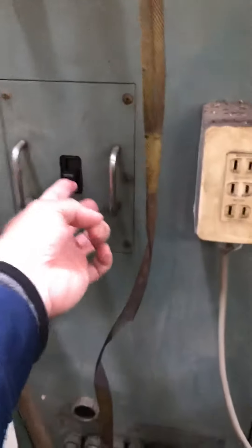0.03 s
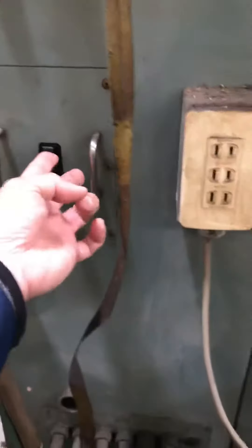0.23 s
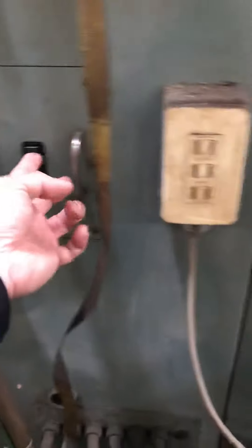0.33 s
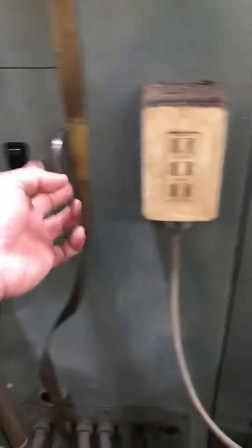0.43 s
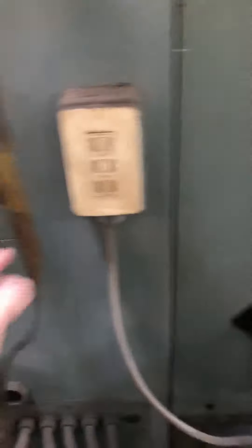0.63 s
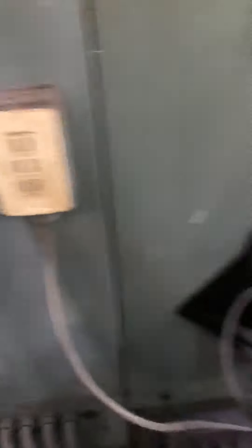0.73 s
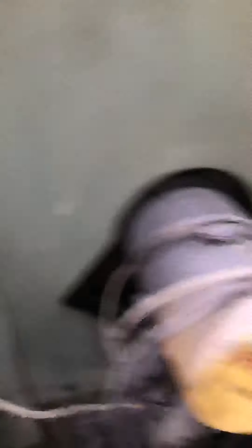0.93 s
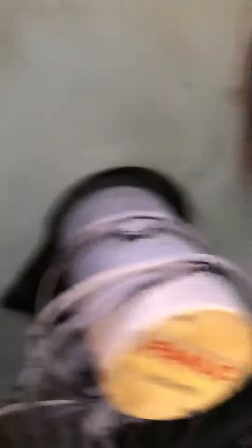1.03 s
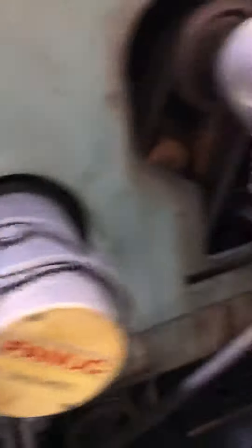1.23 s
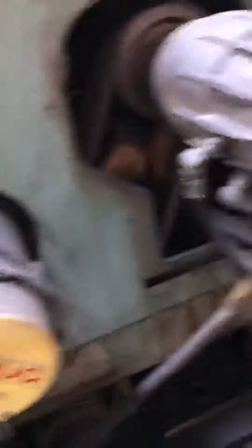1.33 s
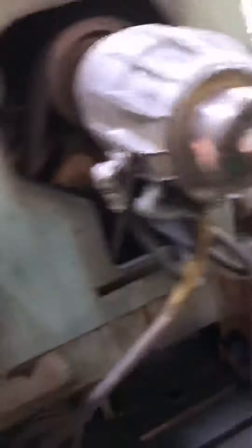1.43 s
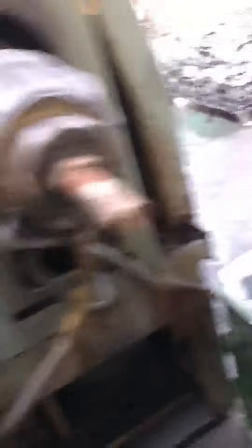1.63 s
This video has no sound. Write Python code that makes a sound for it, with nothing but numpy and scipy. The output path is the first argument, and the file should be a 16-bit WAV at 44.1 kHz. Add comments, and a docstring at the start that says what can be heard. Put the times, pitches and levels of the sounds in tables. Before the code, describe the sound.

A heavy power switch clunks, and a machine starts up humming and whirring.

```python
"""In a workshop, a heavy power switch on a machine tool is thrown. The lever ticks, then the
contacts slam and the steel cabinet rings. The motors take up load with a short groan and a shudder,
and settle into a whine with beating fan tones and rushing air. A magnet core buzzes at twice the
supply frequency. Tones swell and fade as the listener moves along the machine."""
import sys
import numpy as np
from scipy import signal
from scipy.fft import rfft, irfft, next_fast_len
from scipy.io import wavfile
from scipy.ndimage import map_coordinates

SR = 44100
rng = np.random.default_rng(int(sys.argv[2]) if len(sys.argv) > 2 else 0)


def inscribe(sig):
    """Save sig as 16-bit PCM at rate SR to the path in sys.argv[1].

    A 1-D sig is mono; a 2-D sig holds one channel per row.
    Samples are clipped to [-1, 1] before scaling.
    """
    pcm = np.round(np.clip(np.atleast_2d(sig).T, -1, 1) * 32767)
    wavfile.write(sys.argv[1], SR, pcm.astype(np.int16))


N = 74970
SLAM_S, RUN_S = 0.2455, 0.285  # when the contacts slam and the motors start

# The switch's hits. Each row: start in seconds, level in dB.
HITS = [(0.115, -40), (0.2245, -46), (0.2377, -31), (0.2403, -24), (0.2455, -12), (0.2464, -3.5),
        (0.2515, -30)]
# The colour of a hit. Each row: frequency in Hz, level in dB.
HIT_COLOUR = [(200, 4), (1000, -6), (3500, 1), (5500, -6), (8000, -4.5), (12000, -4), (16000, -6)]

def switch():
    """Each contact gives a short, bright crack."""
    return noise(HIT_COLOUR) * sum(amp(db) * struck(s, rise=0.00022, t60=0.016) for s, db in HITS)


# The cabinet's dense wash of ringing. Each row: frequency in Hz, level in dB.
WASH_COLOUR = [(24, -39), (40, -6.5), (183, -5.5), (235, 3.5), (301, -1.5), (387, -0.5), (496, -4),
               (722, -2), (778, -4.5), (1080, -10), (1160, -9.5), (1380, -9), (1640, -11), (1960, -5.5),
               (2110, -1), (3140, -10), (3470, -7.5), (4460, -10), (5050, -17), (6980, -13.5),
               (10400, -16.5), (13000, -10), (15500, -17)]
# How long the wash lasts. Each row: frequency in Hz, seconds to fade by 60 dB.
WASH_FADE = [(60, 1), (250, 0.43), (800, 0.57), (2000, 0.19), (4000, 0.17), (8000, 0.13), (15000, 0.085)]
# Clear notes of switch and panel. Each row: pitch in Hz, level in dB, seconds to fade by 60 dB.
STEEL_NOTES = [(233, -23.5, 0.26), (364.4, -22.5, 0.15), (1077, -23, 0.12), (1580, -25, 0.091),
               (2260, -19, 0.074), (2806, -12.5, 0.051), (3420, -24, 0.11), (3650, -37, 0.064),
               (4050, -21, 0.062), (5050, -44, 0.85), (6780, -31.5, 0.13)]

def cabinet():
    """The slam rings a few clear notes and a dense wash whose treble dies first."""
    rise_s = 0.0022
    age = np.maximum(clock() - SLAM_S, 0)
    hz, t, bands = signal.stft(noise(WASH_COLOUR), SR, nperseg=256)
    fade = amp(-60 * np.maximum(t - SLAM_S, 0) / along(WASH_FADE, hz)[:, None])
    wash = signal.istft(bands * fade, SR, nperseg=256)[1][:N] * (1 - np.exp(-age / rise_s))
    ring = sum(amp(db) * struck(SLAM_S, rise_s, t60) * np.sin(2 * np.pi * f * age + 0.5 * wobble(117.8))
               for f, db, t60 in STEEL_NOTES)
    return amp(-15) * wash + ring


# The groan's tones. Each row: peak time in seconds, pitch in Hz, level in dB,
# rise in seconds, seconds to fade by 60 dB.
GROAN_TONES = [(.349, 632, -28.5, 0.032, 0.14), (0.328, 856, -27, 0.0081, 0.24),
               (0.377, 883, -34.5, 0.06, 1.09), (0.351, 1255, -30, 0.012, 0.046),
               (.369, 172, -24, .018, 0.055), (0.373, 146, -33, 0.054, 0.39), (0.38, 340, -41, 0.032, 0.31),
               (0.365, 221, -36, 0.041, 0.52), (0.43, 100, -46, 0.067, 1.3),
               (0.33, 48.3, -37.5, 0.081, 1.76)]

def groan():
    """Shuddering tones swell and fade as the motors take up load."""
    t, out = clock(), np.zeros(N)
    fade_in = np.clip((t - SLAM_S) / 0.04, 0, 1)
    for s, hz, db, rise, t60 in GROAN_TONES:
        swell = np.where(t < s, np.exp((t - s) / rise), amp(-60 * np.abs(t - s) / t60))
        note = tone(hz * (1 + 0.0072 * wobble(61.1)))
        shudder_db = 2.7 * wobble(69.96) + 1.9 * wobble(17.9)
        out += amp(db + shudder_db) * swell * note
    return out * fade_in


# The fans' tones. Each row: pitch in Hz, level in dB, time of that level in seconds,
# drop in dB per second before and after it (a negative drop is a rise).
FAN_NOTES = [(220.4, -52, 0.47, 6.5), (296.4, -51.5, .8, 13.5), (302.7, -47, 0.82, 16.5),
             (340.4, -53, 0.5, 13.5), (400, -51, 0.4, 10), (439, -42.5, 0.4, 13.5), (500, -58, 1.6, 11),
             (632.7, -52, 0.46, 7), (700.5, -49, 0.66, 8), (749, -47.5, 1, 17), (761, -48.5, 1.07, 13),
             (781, -59, 0.87, -4), (824, -51.5, 0.97, 6), (880.5, -48, 0.76, 17), (894, -50, 1.66, 25),
             (964, -51, 1.65, 23), (1056, -57, 1.2, 20), (1097, -48, 1.15, 31), (1220, -58, 0.81, 11),
             (1223.5, -53, 1, 17), (1755, -53.5, 0.99, 11.5), (2303, -54, 1.65, 4.5), (4100, -60, 1.5, 12),
             (4370, -62, 1.26, -2)]
# Blade tones of similar fans, close enough in pitch to beat. Each row: as above.
BLADE_NOTES = [(660.8, -41.5, .75, 4), (673.1, -43, 1.6, 8), (685.3, -44.5, .7, 7)]

def fans():
    """Fan tones flutter and blade tones beat; most swell as the listener passes their vent."""
    t, out = clock(), np.zeros(N)
    in_step_s = 1.441  # the blade tones line up here
    for hz, db, s, drop in FAN_NOTES:
        level = amp(db - drop * np.abs(t - s) + 1.5 * wobble(14.3))
        roughness = 1 + 0.27 * wobble(90)
        out += level * roughness * tone(hz * (1 + 0.002 * wobble(30)))
    for hz, db, s, drop in BLADE_NOTES:
        phase = 2 * np.pi * hz * (t - in_step_s) + 0.14 * wobble(24)
        out += amp(db - drop * np.abs(t - s)) * np.sqrt(2) * np.cos(phase)
    fade_in = 1 - np.exp(-np.maximum(t - RUN_S, 0) / 0.018)
    return out * fade_in


# How loud the whine is. Each row: time in seconds, level in dB.
WHINE_LEVEL = [(.3, -67), (.47, -47.5), (.8, -47.5), (1.1, -49.5), (1.23, -40.5), (1.54, -43), (1.63, -54),
               (1.7, -58)]

def motor():
    """The motor whines at a nearly steady pitch with a slightly rough level."""
    level = amp(curve(WHINE_LEVEL) + 1.4 * wobble(59.94))
    return level * tone(hz=1173.6 + 1.05 * wobble(15.2)) * (clock() > RUN_S)


# The colour of the rushing air. Each row: frequency in Hz, level in dB.
RUSH_COLOUR = [(18, -50), (30, -40), (221, -12), (374, -19), (449, -17), (554, -21), (666, -6.5),
               (740, -12.5), (988, -17), (1160, -10), (1280, -19), (1600, -17.5), (1860, -26), (2290, -17),
               (2540, -24.5), (3490, -23.5), (4910, -29), (5900, -32.5), (6720, -32.5), (7870, -38),
               (9220, -30.5), (10500, -42.5), (12300, -37), (16000, -40.5)]
# How loud it is. Each row: time in seconds, level in dB.
RUSH_LEVEL = [(.25, -50), (.33, -38), (.6, -42.5), (.9, -40), (1.3, -40.5), (1.7, -40.5)]

def air():
    """Cooling air rushes once the power is on."""
    return noise(RUSH_COLOUR) * amp(curve(RUSH_LEVEL) + 0.55 * wobble(12.3)) * (clock() > SLAM_S)


# The core's rattles. Each row: centre in Hz, width in Hz, level in dB, delay in seconds.
RATTLES = [(3460, 720, -45.5, 0.0014), (6630, 490, -47.5, 0.0017), (6944, 540, -47.5, 0.0001),
           (9250, 530, -54, 0.0047), (12260, 2400, -62.5, 0.0025)]
# How the whole buzz rises and falls. Each row: time in seconds, gain in dB.
BUZZ_GAIN = [(.28, -12), (.36, -15), (.55, -8), (.605, -30), (.622, -22), (.65, -2), (.74, -4.5),
             (.82, -3.5), (1.03, -1.5), (1.25, -1.5), (1.45, -5.5), (1.7, -3.5)]

def core_buzz():
    """The core rattles at each magnetic pull and more weakly on release, each cycle much alike."""
    buzz_hz, pull_at_s = 96.4, 0.9274
    rise_s, decay_s = 0.0003, 0.0014
    t, out = clock(), np.zeros(N)

    def pulse(cycles):
        age = cycles % 1 / buzz_hz
        return (1 - np.exp(-age / rise_s)) * np.exp(-age / decay_s)

    for hz, width, db, delay in RATTLES:
        cycles = (t - pull_at_s - delay) * buzz_hz
        repeated = map_coordinates(rng.standard_normal(1024), [cycles % 1 * SR / buzz_hz], order=5)
        drive = repeated + amp(3.5) * rng.standard_normal(N)
        ring = signal.hilbert(filtered(drive, lambda f: 1 / (1 + ((f - hz) / width * 2) ** 2)))
        evened = ring.real / (np.abs(ring) + 0.34 * np.std(ring))
        beats = pulse(cycles) + amp(-18) * pulse(cycles + 0.5) + 0.17  # pull, release, steady part
        flicker_db = 1.2 * wobble(59.7)
        drift_db = 1.73 * wobble(5.12)  # each rattle swells on its own as the listener moves
        out += amp(db + flicker_db + drift_db) * unit(evened * beats)
    return out * amp(curve(BUZZ_GAIN)) * (t > SLAM_S)


# The colour of the room's rumble. Each row: frequency in Hz, level in dB.
RUMBLE_COLOUR = [(15, -43), (25, -15), (55, -8.5), (76, -11), (141, -8), (476, -25), (531, -31),
                 (754, -34.5), (1260, -32), (9320, -51), (16000, -59)]

def workshop():
    """The room rumbles, low and steady."""
    return amp(-48) * noise(RUMBLE_COLOUR)


def amp(db):
    """Turn decibels into a gain."""
    return 10 ** (np.asarray(db) / 20)


def unit(x):
    """Scale to an average (rms) level of 1."""
    return x / np.sqrt(np.mean(x ** 2) + 1e-20)


def clock():
    """The time of each sample in seconds."""
    return np.arange(N) / SR


def along(points, hz):
    """Read between (Hz, value) points on a log frequency scale."""
    f, v = np.transpose(points)
    return np.interp(np.log(hz + 1), np.log(f + 1), v)


def curve(rows):
    """Join (seconds, value) points with straight lines."""
    return np.interp(clock(), *np.transpose(rows))


def wobble(rate):
    """A smooth curve through `rate` random points a second."""
    return map_coordinates(rng.standard_normal(1024), [clock() * rate + 2], mode="wrap")


def filtered(x, response):
    """Scale each frequency in x by response(hz)."""
    size = next_fast_len(N + SR // 2)
    return irfft(rfft(x, size) * response(np.fft.rfftfreq(size, 1 / SR)), size)[:N]


def noise(colour):
    """Noise of level 1 with the given balance of low and high."""
    return unit(filtered(rng.standard_normal(N), lambda hz: amp(along(colour, hz))))


def struck(s, rise, t60):
    """The loudness of a blow at time s: it rises, and fades by 60 dB in t60 seconds."""
    age = np.maximum(clock() - s, 0)
    return (1 - np.exp(-age / rise)) * amp(-60 * age / t60)


def tone(hz):
    """A pure tone of level 1 that follows a pitch curve."""
    return np.sqrt(2) * np.sin(2 * np.pi * (np.cumsum(hz) / SR + rng.random()))


def scene():
    """Switch and machine over the workshop's rumble, in one channel."""
    return (switch() + cabinet() + groan() + fans() + motor() + air() + core_buzz() + workshop())[None]


def record(dry):
    """Drop the deepest bass, round off the tallest peaks and cut the highest treble."""
    bottom_hz, top_hz, peak_limit = 36, 16000, 0.78
    low_cut = signal.sosfilt(signal.butter(6, bottom_hz, "highpass", fs=SR, output="sos"), dry[0])
    rounded = low_cut / (1 + (low_cut / peak_limit) ** 6) ** (1 / 6)
    return filtered(rounded, lambda hz: 1 / (1 + (hz / top_hz) ** 120))[None]


dry = scene()
out = record(dry)
inscribe(out)
```